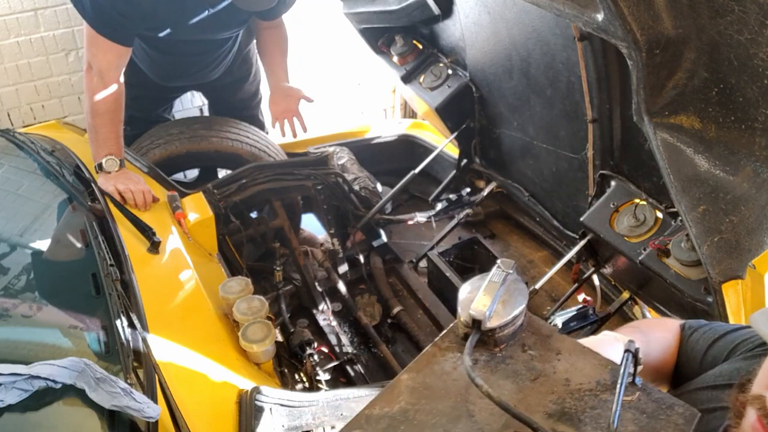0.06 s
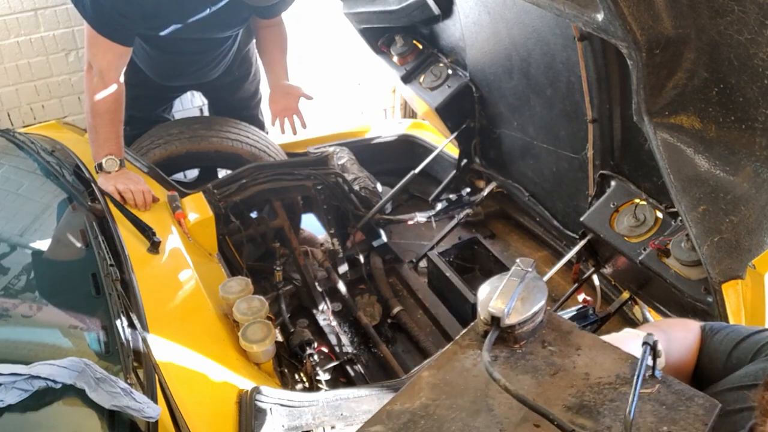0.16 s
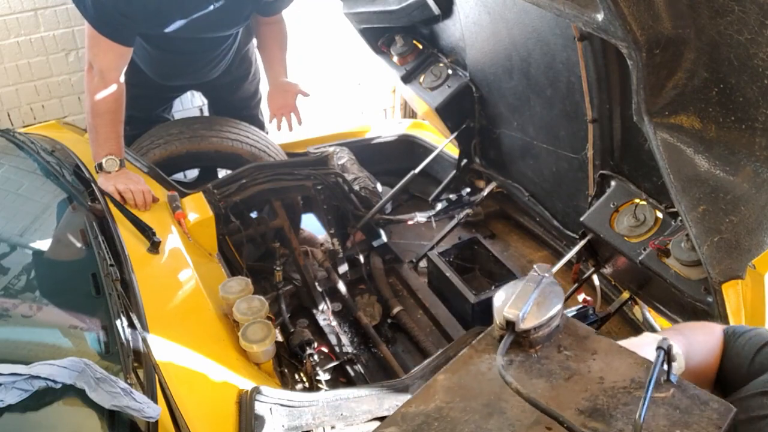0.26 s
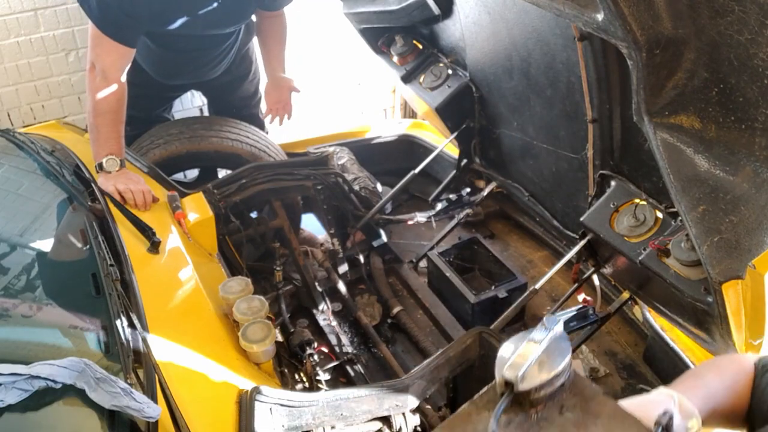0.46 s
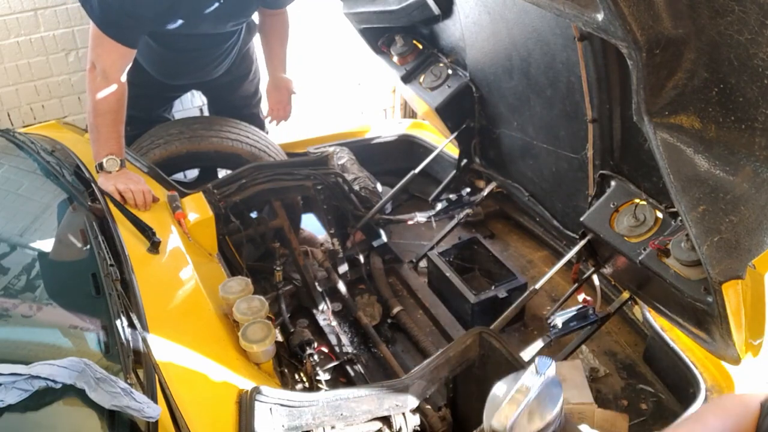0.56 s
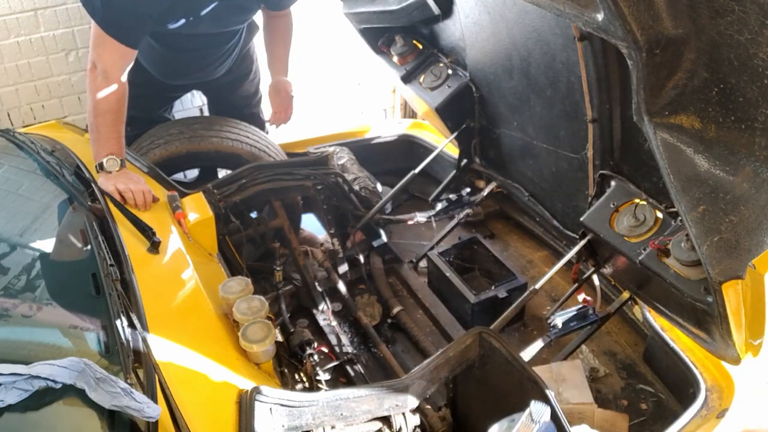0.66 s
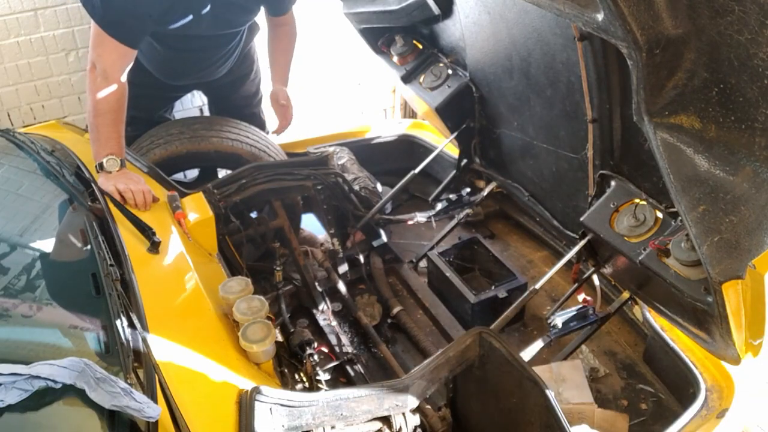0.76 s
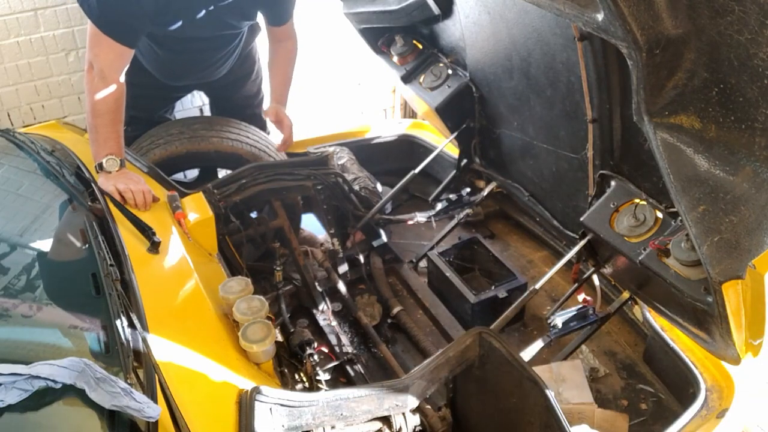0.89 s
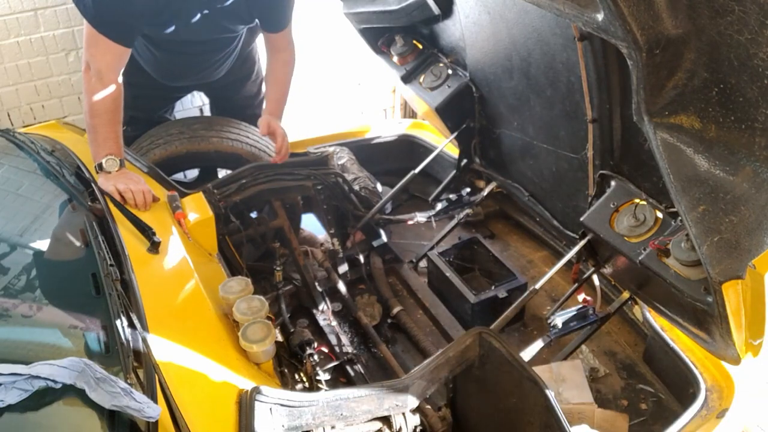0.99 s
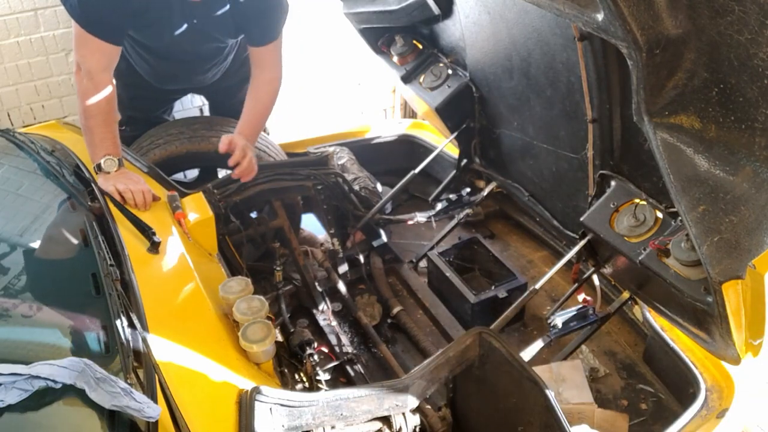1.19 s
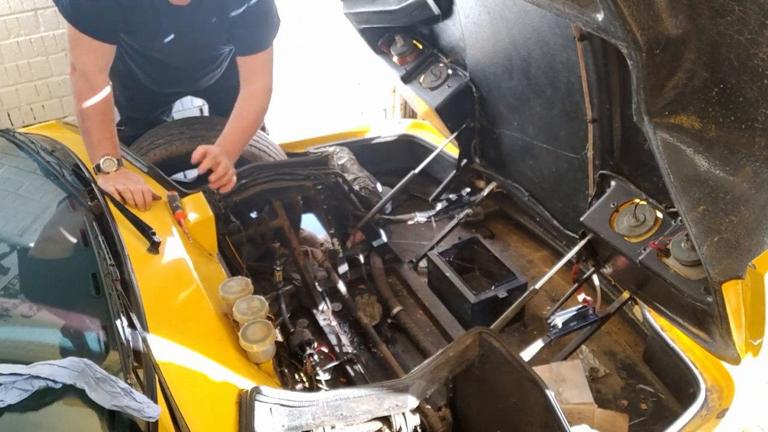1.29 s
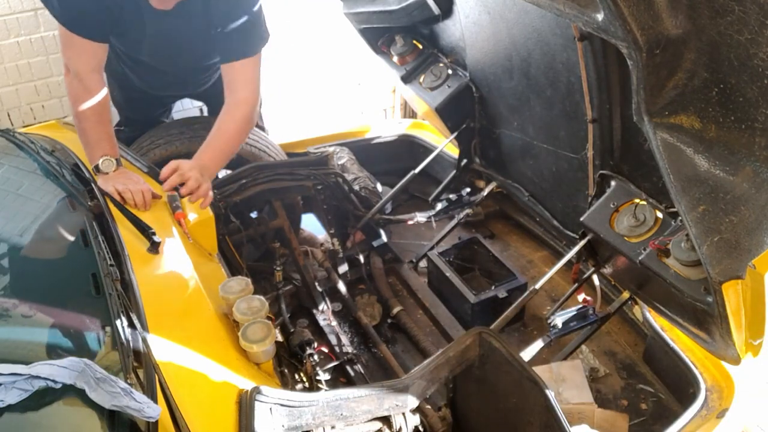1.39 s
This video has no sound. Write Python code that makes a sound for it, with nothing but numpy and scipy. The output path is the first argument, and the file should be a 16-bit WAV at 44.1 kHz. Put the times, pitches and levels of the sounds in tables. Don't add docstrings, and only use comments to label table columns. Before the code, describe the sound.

A thin sheet-metal tank clunks and rattles loudly against a car body, then knocks more softly.

```python
import sys
import numpy as np
from scipy import signal
from scipy.fft import rfft, irfft, next_fast_len
from scipy.io import wavfile
from scipy.ndimage import uniform_filter1d, map_coordinates

SR = 44100
rng = np.random.default_rng(int(sys.argv[2]) if len(sys.argv) > 2 else 0)


def ratio_of_db(decibels):
    return 10 ** (np.asarray(decibels, float) / 20)


def generate_wav(signal):
    frames = np.transpose(np.atleast_2d(signal))
    scaled = np.clip(frames, -1, 1) * 32767
    pcm = np.round(scaled).astype(np.int16)
    wavfile.write(sys.argv[1], SR, pcm)


N = 63945

# f/Hz, level/dB, time to fall by 60 dB/s
SHELL = [(901.5, -3, 0.13), (1115, -8, 0.17), (1180.6, -3.5, 0.14), (1412, 2.5, 0.078), (1516, -4.5, 0.064),
         (1742, -8.5, 0.15), (1985, -6.5, 0.12), (2229, -0.5, 0.098), (2565, -1.5, 0.078),
         (3000, -13.5, 0.28), (3320, -12, 0.068), (3520, -22, .1), (3920, -23, 0.042), (4200, -9.5, 0.039)]
# f/Hz, level/dB, time to fall by 60 dB/s
DRUM = [(235.5, -4.5, 0.1), (280.7, -2.5, 0.095), (340.3, -6, 0.12), (395, -4.5, 0.083), (518, -3.5, 0.087),
        (600, -3.5, 0.07)]
# f/Hz, level/dB per Hz
CLATTER = [(290, -55), (500, -13), (1000, -8), (2600, -3.5), (3840, -8.5), (6000, -44), (7800, -39),
           (13200, -120)]
# f/Hz, level/dB per Hz
TICK = [(3500, -40), (5500, -21.5), (7000, -14.5), (10000, -11), (12900, 0.5), (14600, -9), (16400, -19)]


def unit(x):
    return x / np.sqrt(np.mean(x ** 2) + 1e-20)


def along(points, hz):
    f, value = np.transpose(points)
    return np.interp(np.log(hz + 1), np.log(f + 1), value)


def curves(rows):
    s, *columns = np.transpose(rows)
    return [np.interp(np.arange(N) / SR, s, column) for column in columns]


def wobble(rate):
    knots = rng.standard_normal(int(N * rate / SR) + 4)
    return map_coordinates(knots, [np.arange(N) * rate / SR])


def filtered(x, response):
    m = next_fast_len(len(x) + SR // 2)
    hz = np.fft.rfftfreq(m, 1 / SR)
    return irfft(rfft(x, m) * response(hz), m)[:len(x)]


def coloured(x, spectrum):
    return unit(filtered(x, lambda hz: ratio_of_db(along(spectrum, hz))))


def patchy(patchy_db):
    z = signal.stft(rng.standard_normal(N), nperseg=512)[2]
    field = uniform_filter1d(rng.standard_normal(z.shape), 5, 0)
    field = uniform_filter1d(field, 6, 1)
    return signal.istft(z * ratio_of_db(patchy_db * unit(field)), nperseg=512)[1][:N]


def soft_start(t, rise_s):
    return 1 - np.exp(-t / rise_s)


def ringing(modes, t, tilt_db=0):
    damping = 0.67
    scatter_db = 2
    hz, db, t60 = np.transpose(modes)[:, :, None]
    strength_db = db + tilt_db * np.log2(hz / 2000) + scatter_db * rng.standard_normal(hz.shape)
    gain = ratio_of_db(strength_db) * rng.choice([-1, 1], hz.shape)
    decay = ratio_of_db(-60 * t / (damping * t60))
    return np.sum(gain * decay * np.sin(2 * np.pi * hz * t), axis=0)


def rough_tone(hz, count, rough):
    hz = hz * np.ones(count)
    wander = rough * np.sqrt(hz / SR) * rng.standard_normal(count)
    return np.sin(np.cumsum(2 * np.pi * hz / SR + wander))


def pings(rows, rough):
    out, t = np.zeros(N + SR), np.arange(SR // 3) / SR
    for s, hz, db, t60 in rows:
        start = round(s * SR)
        envelope = ratio_of_db(db - 60 * t / t60) * soft_start(t, 0.001)
        out[start:start + len(t)] += envelope * rough_tone(hz, len(t), rough)
    return out[:N]


def air():
    # f/Hz, level/dB per Hz
    air_colour = [(15, -63), (40, -8), (258, -12.5), (704, -29), (1090, -7.5), (1550, -58), (3790, -29),
                  (4710, -47), (16400, -48)]
    return ratio_of_db(-63.5 + 0.8 * wobble(6)) * coloured(patchy(patchy_db=2), air_colour)


def rustle():
    # t/s, level/dB, brightness/dB, weight/dB
    handling = [(0, -49.5, 6.5, -7), (.05, -55, 3.5, -7.5), (.14, -52.5, 3, -9), (.17, -61.5, 11.5, 2),
                (.45, -50, -1.5, 2.3), (.56, -54.5, 4.5, -6), (.6, -54, 2, -1.5), (.65, -57.5, 12, 0.1),
                (.8, -49, 4.5, 1), (.845, -51.5, -1, -10), (.872, -61.5, 13, -2), (.94, -52, 5, 2.5),
                (.97, -45.5, 11, 0), (1.04, -51, 4.5, 1.5), (1.16, -49, 4.5, -4), (1.24, -56, 5, 1.5),
                (1.35, -60, -1, -0.5), (1.45, -54.5, -1.5, 2)]
    # f/Hz, level/dB per Hz
    cloth_colour = [(94, -27), (160, -3.5), (307, -2.5), (827, -9), (1660, -10.5), (3740, -11.5),
                    (5500, -38.5), (7150, -76), (12100, -120)]
    fizz_colour = [(4500, -48), (6000, -18.5), (8500, -7.5), (10500, -8), (12800, -1), (15000, -10.5),
                   (16400, -16.5)]
    rumble_colour = [(15, -48), (35, -17), (66, 0), (113, -6), (130, -7.5), (170, -33), (290, -120)]
    hum_db, fizz_db, rumble_db = -8, -18.5, -59.5
    weight_hz = 300

    level_db, bright_db, weight_db = curves(handling)
    cloth = ratio_of_db(1.5 * wobble(25)) * coloured(patchy(patchy_db=2), cloth_colour)
    tank_ring = ringing(DRUM + SHELL, np.arange(SR // 4) / SR, tilt_db=-2.5)
    hum = unit(signal.fftconvolve(patchy(patchy_db=2.5), tank_ring)[:N])
    body = cloth + ratio_of_db(hum_db) * hum
    low = filtered(body, lambda hz: 1 / (1 + (hz / weight_hz) ** 4))
    fizz = ratio_of_db(fizz_db + bright_db + 1.9 * wobble(59.8)) * coloured(patchy(patchy_db=3.0), fizz_colour)
    rumble = ratio_of_db(rumble_db + weight_db) * coloured(rng.standard_normal(N), rumble_colour)
    return ratio_of_db(level_db) * (body + (ratio_of_db(weight_db) - 1) * low + fizz) + rumble


def rubbed_brackets():
    # t/s, f/Hz, level/dB, time to fall by 60 dB/s
    rubs = [(0.001, 2777, -43, 0.12), (.085, 2715, -51, .3), (.12, 3420, -48.5, 0.16),
            (.186, 7400, -56.5, 0.12), (.208, 1760, -34.5, 0.1), (.612, 3530, -48.5, 0.12),
            (.64, 2770, -45, 0.038), (.882, 4100, -53.5, 0.11), (1.285, 3740, -54, 0.1),
            (1.386, 1750, -54, 0.46), (1.13, 529, -47.5, 0.39), (1.13, 350, -48, 0.53),
            (.952, 2250, -45.5, .1), (1.0, 1133, -47, .12), (1.36, 2160, -54, .07), (1.39, 370, -52, 0.56)]
    return pings(rubs, rough=0.49)


def knocks():
    # t/s, shell
    # peak/dB, drum over shell/dB, tick over shell/dB, hardness/dB per octave
    contacts = [(0.188, -39, 0.5, -5.5, -5), (0.205, -39.5, 11, -18, -3), (0.218, -39, 1, 1, -6),
                (.233, -22, -2, -9.5, -8), (.237, -4, -10, -21.5, 0), (.247, -14, -14, -11, -4),
                (.253, -11.5, -13.5, -16, 17), (.265, -8.5, -19, -8, 3), (.269, -5.5, -8.5, -3.5, 11),
                (.275, -6, -9, -13.5, 5), (.298, -27, 3, -1, 2), (.31, -23, 4, -11, 1),
                (.331, -3, -25, -15.5, 3), (.336, -5.5, -25, -27, 2), (.351, -7, -27, -17.5, 7),
                (.355, -14, -30, -22, -0.5), (.362, -8.5, -49, -43, -1), (.386, -11.5, -21, -39, -2),
                (.394, -19, -17, -30, -6), (.434, -34.5, -22, -5.5, -1), (.438, -34.5, -21, -8, -2),
                (.139, -40, -20, -20, 4), (.58, -37.5, -3.5, -30, -1), (.596, -35, -4.5, -25, -7.5),
                   (.61, -37, -22, -28, -2), (.664, -26, -37, -12.5, -2.5), (.7037, -22.5, -7.5, -16, 0),
                   (0.718, -18.5, -6, -31, -6), (.732, -20, -9.5, -6, 2), (.737, -16, -16, -16, 1),
                   (.748, -24, -7, -20, -3), (0.753, -31, 5, -28, -15), (.767, -29.5, 0.5, -19, 7),
                   (.773, -35.5, 1, -22, 4), (0.835, -36.5, -25, -24, 5), (.949, -34.5, -9, 2.5, 5),
                   (.954, -31, -12, 5, 8), (.968, -52, -5, -13, -3), (1.0, -46, -7, -9, 3),
                   (1.13, -36.5, -3, -15.5, -3), (1.152, -44, 8, 6, 7), (1.386, -50, 9, -29, -13)]
    ring_db, clatter_db, panel_db, bright_db = -20, -10.5, -7.5, -4.5
    clatter_t60, tick_t60 = 0.047, 0.016
    shell_rise, drum_rise, tick_rise = 0.00013, 0.001, 0.0006

    out, t = np.zeros(N + SR), np.arange(SR // 3) / SR
    for s, db, drum_db, tick_db, hardness in contacts:
        colour = [(hz, level + hardness * np.log2(np.clip(hz, 700, 4500) / 2000)) for hz, level in CLATTER]
        clatter = coloured(rng.standard_normal(len(t)), colour)
        shell = ratio_of_db(ring_db) * ringing(SHELL, t, hardness)
        shell += ratio_of_db(clatter_db - 60 * t / clatter_t60) * clatter
        drum = ratio_of_db(panel_db + drum_db) * ringing(DRUM, t)
        tick = coloured(rng.standard_normal(len(t)), TICK)
        tick = ratio_of_db(bright_db + tick_db - 60 * t / tick_t60) * tick
        hit = shell * soft_start(t, shell_rise)
        hit += drum * soft_start(t, drum_rise)
        hit += tick * soft_start(t, tick_rise)
        start = round(s * SR)
        out[start:start + len(t)] += ratio_of_db(db) * hit
    return out[:N]


def drag():
    # t/s, level/dB
    scraping = [(.17, -61), (.2, -45.5), (.232, -35), (.245, -16.5), (.3, -21), (.325, -25.5), (.36, -27),
                (.4, -34), (.46, -52), (.5, -73), (.655, -60.5), (.67, -39.5), (.7, -41), (.72, -35),
                (.775, -40.5), (.8, -80), (.83, -76)]
    grains_per_s, spread_db = 830, 4
    ring_db, drum_db, tick_db = -6.5, -10.5, -23

    level_db, = curves(scraping)
    slips = rng.random(N) < grains_per_s / SR
    size = ratio_of_db(-spread_db * np.log(rng.random(N) + 1 / 20))
    grains = slips * size * rng.standard_normal(N)
    force = ratio_of_db(level_db) * unit(grains + 0.34 * rng.standard_normal(N))

    t = np.arange(SR // 4) / SR
    clatter = coloured(rng.standard_normal(len(t)), CLATTER) * ratio_of_db(-60 * t / 0.025)
    tick = coloured(rng.standard_normal(len(t)), TICK) * ratio_of_db(-60 * t / 0.014)
    parts = [(0, clatter), (ring_db, ringing(SHELL, t)), (drum_db, ringing(DRUM, t)), (tick_db, tick)]
    answer = sum(ratio_of_db(db) * part / np.linalg.norm(part) for db, part in parts)
    return signal.fftconvolve(force, answer)[:N]


def squeak():
    start_hz, end_hz = 10500, 7300
    fall_s, swell_s = 0.00414, 0.0061
    t = np.maximum(np.arange(N) / SR - 0.179, 0)
    hz = end_hz + (start_hz - end_hz) * np.exp(-t / fall_s)
    swell = t / swell_s * np.exp(1 - t / swell_s)
    return ratio_of_db(-56.5) * swell * rough_tone(hz, N, rough=1.2)


def struck_tones():
    # t/s, f/Hz, level/dB, time to fall by 60 dB/s
    favoured = [(.235, 578, -16, 0.039), (.236, 246, -18.5, 0.095), (.238, 1500, -14, 0.21),
                (.238, 2496, -14.5, .06), (.237, 3460, -17, 0.037), (.237, 3046, -15, 0.047),
                (.24, 879, -19, .18), (.252, 3430, -19, .05), (.265, 3014, -16, 0.11),
                (.27, 3920, -15, 0.092), (.273, 600, -17.5, 0.065), (.272, 355, -18, 0.042),
                (.276, 2516, -16, 0.063), (.298, 274.6, -21, 0.114), (.305, 1695, -26.5, .15),
                (.331, 2250, -12.5, 0.06), (.331, 3555, -14, 0.052), (.332, 1495, -15, 0.058),
                (.336, 1815, -16.5, 0.072), (.331, 3910, -16.5, 0.058), (.333, 1119, -19, 0.13),
                (.35, 1169, -18, .18), (.352, 3230, -20.5, 0.086), (.386, 1797, -24.5, 0.087),
                (.386, 3300, -25.5, 0.042), (.706, 2340, -21, 0.03), (.709, 1370, -22.5, 0.042),
                (.706, 925, -29, 0.12), (.718, 2310, -26, 0.033), (.721, 1290, -17.5, 0.02),
                (.733, 1416, -25.5, .09), (.735, 2594, -21.5, 0.032), (.735, 2240, -26, 0.052),
                (.734, 1197, -24, 0.044), (.742, 3470, -27.5, 0.055), (.752, 352, -29, 0.06),
                (.765, 3460, -32.5, .05)]
    return pings(favoured, rough=0.18)


def booms():
    # t/s, f/Hz, level/dB, length/s
    panels = [
        (0.246, 114.8, -35.5, 0.13),
        (0.706, 340, -35.5, 0.07),
        (.69, 87, -54, 0.048),
        (.745, 134, -45.5, 0.035),
        (.31, 200, -35.5, 0.0385),
    ]
    grip_s, sway_db = 0.0075, 2
    t = np.arange(N) / SR
    out = np.zeros(N)
    for s, hz, db, length in panels:
        begin = np.clip((t - s) / grip_s, 0, 1)
        end = np.clip((t - (s + length)) / grip_s, 0, 1)
        level = ratio_of_db(db + sway_db * wobble(44.75))
        out += level * (begin - end) * rough_tone(hz, N, rough=0.4)
    return out


def garage(x):
    # f/Hz, time to fall by 60 dB/s
    room = [(200, 0.18), (2000, 0.16), (10000, 0.17)]
    hz, t, z = signal.stft(rng.standard_normal(SR // 2), SR, nperseg=256)
    decay = ratio_of_db(-60 * t / along(room, hz)[:, None])
    tail = signal.istft(z * decay, SR, nperseg=256)[1]
    late = np.pad(x, (300, 0))
    return signal.fftconvolve(late, tail / np.linalg.norm(tail))[:N]


def scene():
    tank = rubbed_brackets() + knocks() + drag() + squeak() + struck_tones() + booms()
    tank = filtered(tank, lambda hz: (1j * hz / (88 + 1j * hz)) ** 2)
    return (tank + ratio_of_db(-20) * garage(tank) + rustle() + air())[None]


def top_cut(x):
    return signal.sosfilt(signal.butter(12, 16810, fs=SR, output="sos"), x)


def record(dry):
    low_cut_hz, top_hz = 34, 15780
    mic = lambda hz: (hz < top_hz) * (1j * hz / (low_cut_hz + 1j * hz)) ** 2
    mix = filtered(dry[0], mic)[None]
    return top_cut(mix)


dry = scene()
out = record(dry)
generate_wav(out)
```